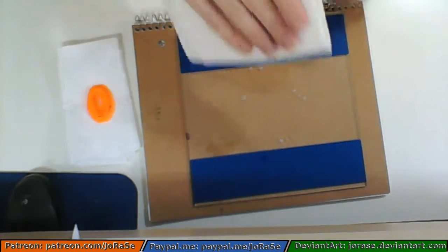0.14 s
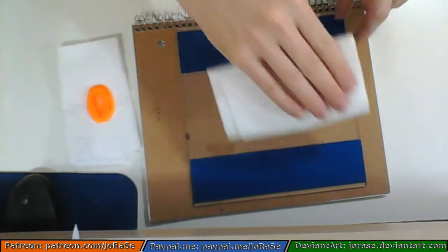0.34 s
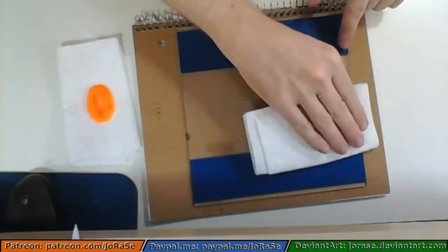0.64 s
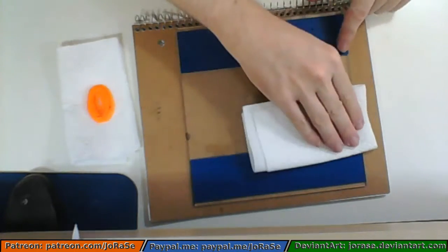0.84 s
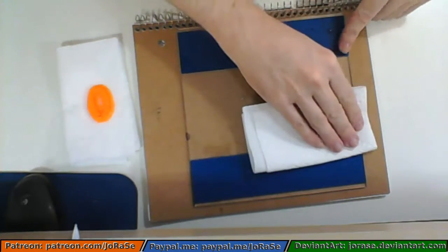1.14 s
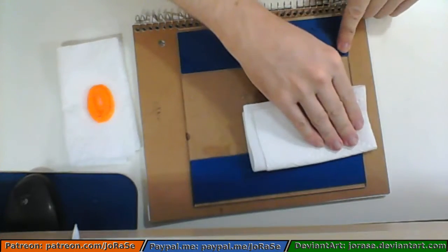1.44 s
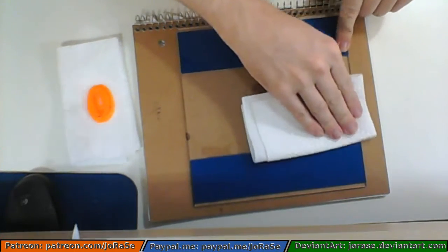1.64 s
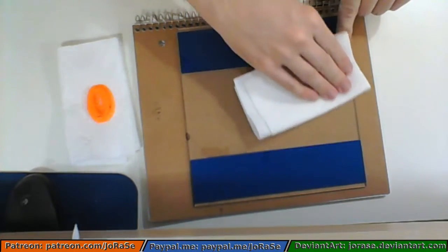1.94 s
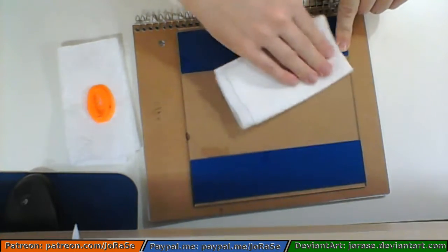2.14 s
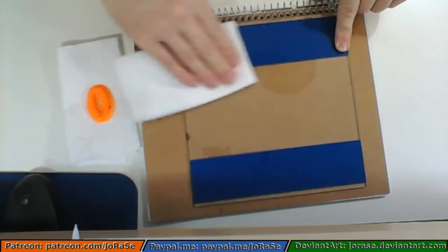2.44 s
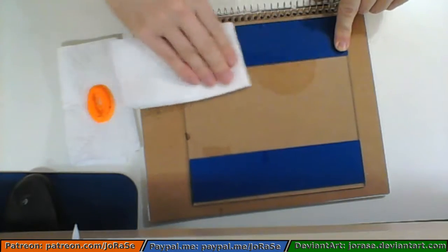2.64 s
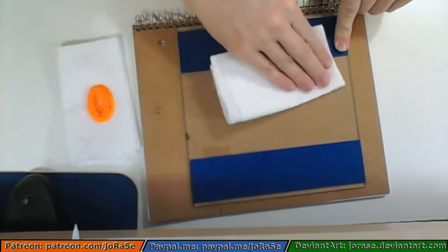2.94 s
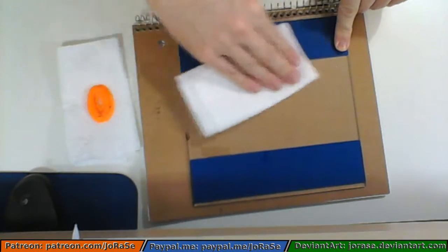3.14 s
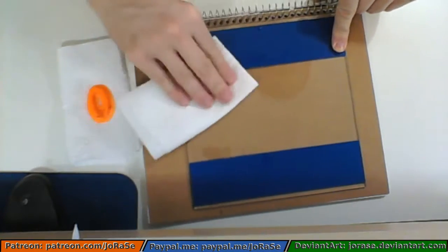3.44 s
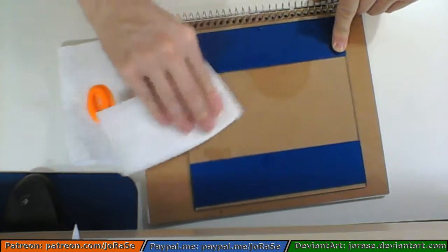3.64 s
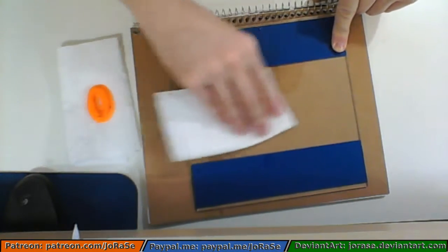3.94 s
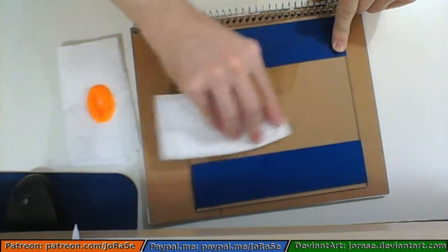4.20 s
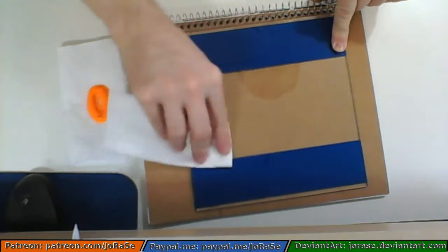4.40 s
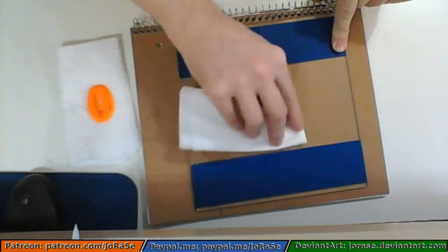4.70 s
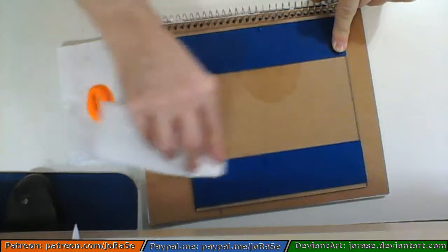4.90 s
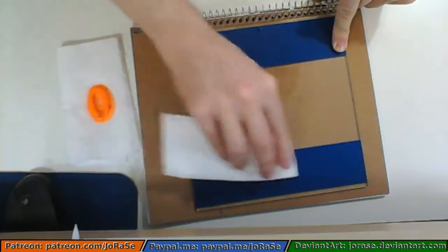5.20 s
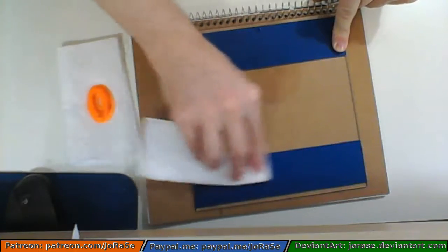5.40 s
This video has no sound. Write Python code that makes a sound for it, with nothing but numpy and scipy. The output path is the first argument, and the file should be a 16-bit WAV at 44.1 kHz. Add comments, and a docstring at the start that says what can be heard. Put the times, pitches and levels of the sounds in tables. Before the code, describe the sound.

Close microphone at a table in a quiet room with a steady low fan and mains hum. A folded paper towel brushes a glass pane, first in faint short touches, then from two seconds in firmer overlapping wipes with a grainy hiss and low-mid finger rasps. Quick separate strokes continue to the end, while arm movement pushes soft, very low puffs of air at the microphone.

```python
"""A table in a room with a fan and mains hum: their rush, low tones and a faint whine last throughout.
A folded paper towel brushes a glass pane on a notebook, at first in short, mostly faint strokes.
Catching fibres make a grainy hiss and ring the pane; dragging fingers add a rasp of low modes.
From about one second the arm pushes slow puffs of air at the microphone.
Firmer wipes crowd together after two seconds, then quick strokes and rasps go on to the end."""
import sys
import numpy as np
from scipy import signal
from scipy.fft import rfft, irfft
from scipy.io import wavfile
from scipy.ndimage import uniform_filter1d, map_coordinates

SR = 44100
rng = np.random.default_rng(int(sys.argv[2]) if len(sys.argv) > 2 else 0)


def transcribe(signal):
    """Save signal, clipped to [-1, 1], as a 16-bit WAV file at the path in sys.argv[1]."""
    frames = np.atleast_2d(signal).T
    limited = np.clip(frames, -1, 1)
    pcm = np.round(limited * 32767).astype(np.int16)
    wavfile.write(sys.argv[1], SR, pcm)


N = 245195
TIME = np.arange(N) / SR

FAN_DB, HISS_DB = -59, -80  # rms of the fan noise and of the microphone's self-noise
EDGE_HZ = 15700  # band limit of the recorder

# rise and fall times hold for a move of the typical length; longer moves start and stop more gently
EDGE_GROWTH, TYPICAL_S = 0.76, 0.14
# a positive arch is loudest in mid-move, a negative one dips there
STROKE_RISE_S, STROKE_FALL_S, STROKE_ARCH_DB = 0.024, 0.029, -1.5
CATCH_RISE_S, CATCH_FALL_S, CATCH_ARCH_DB = 0.058, 0.02, 4.5
PUFF_RISE_S, PUFF_FALL_S, PUFF_ARCH_DB = 0.0092, 0.063, 0
# the room holds each stroke and catch briefly: level and time constant of the dying power
LINGER_DB, LINGER_S = -8, 0.015

# the pressure of the hand wavers; the embossed paper grips and lets go more quickly (dB rms, Hz)
FLUTTER_DB, FLUTTER_HZ = 0.32, 16.3
CHATTER_DB, CHATTER_HZ = 0.5, 41.8
LOADING, LOADING_HZ = 0.005, 5  # rms share by which the hand bends the upper modes, and how quickly
BITE_WIDTH_HZ = 740  # band that a pressed pad lifts
LIGHT_RING, FIRM_RING = 0.42, 0.1  # share of the hiss power that comes from the glass
LIGHT_STREAK_DB, FIRM_STREAK_DB = 6, 3  # depth of the narrow bands
RASP_WIDTH_HZ = 130  # group of modes that the rasp reaches
RASP_WANDER = 0.028  # rms share by which the pitch of the rasp wanders
CATCH_CLIMB = 0.067  # share by which the pitch of the rasp climbs within a catch
SLIDE_RASP_DB = -18.5  # rasp of smooth sliding, relative to the hiss
STILL_AIR_DB, STILL_RUMBLE_DB = -54, -61.5  # air at the microphone between moves of the arm


def amp(db):
    """Decibels to gain."""
    return 10 ** (np.asarray(db) / 20)


def unit(x):
    """Scales to rms 1."""
    return x / np.sqrt(np.mean(x ** 2) + 1e-20)


def colour(x, points):
    """Filters by a gain curve of (Hz, dB) points joined on a log-frequency axis."""
    hz, db = np.transpose(points)
    bins = np.fft.rfftfreq(N, 1 / SR)
    curve_db = np.interp(np.log(bins + 1), np.log(hz + 1), db)
    return irfft(rfft(x) * amp(curve_db), N)


def drift(hz):
    """Slow chance of rms 1, fading out around the given rate."""
    bins = np.fft.rfftfreq(N, 1 / SR)
    spectrum = rfft(rng.standard_normal(N))
    return unit(irfft(spectrum * np.exp(-(bins / hz) ** 2), N))


def resonate(x, hz, width):
    """A resonance of gain 1 whose centre may move: shift to zero, smooth, shift back."""
    turn = np.exp(2j * np.pi * np.cumsum(hz * np.ones(N)) / SR)
    r = np.exp(-np.pi * width / SR)
    smooth = signal.lfilter([1 - r], [1, -r], x / turn)
    return 2 * (turn * smooth).real


def band(x, low_hz, high_hz):
    """Keeps one band of a force."""
    sos = signal.butter(4, [low_hz, high_hz], "band", fs=SR, output="sos")
    return signal.sosfilt(sos, x)


def steadied(x, size=2205):
    """Holds the level over size samples at 1, so that a curve alone sets the loudness."""
    return x / np.sqrt(np.abs(uniform_filter1d(x ** 2, size)) + 1e-20)


def swells(rows, rise_s, fall_s, arch_db):
    """One envelope per (start, length) row: a soft start, an arched middle and a soft stop."""
    start, length = np.array(rows).T[:2, :, None]
    t = TIME - start
    gentle = (length / TYPICAL_S) ** EDGE_GROWTH
    opening = (1 + np.tanh(t / (rise_s * gentle))) / 2
    closing = (1 + np.tanh((length - t) / (fall_s * gentle))) / 2
    off_centre = np.minimum(np.abs(2 * t / length - 1), 2)
    return opening * closing * amp(-arch_db * off_centre ** 2)


def level(shapes, db):
    """Envelopes, each at its own level, summed in power."""
    return np.sqrt(amp(db) ** 2 @ shapes ** 2)


def linger(gain):
    """Adds a faint dying tail to an envelope."""
    keep = np.exp(-1 / (LINGER_S * SR))
    tail_power = signal.lfilter([1 - keep], [1, -keep], (amp(LINGER_DB) * gain) ** 2)
    return np.sqrt(gain ** 2 + tail_power)


def room():
    """Fan noise, faintly wavering low tones and a high whine, and the even hiss of the microphone."""
    # Spectrum of the fan and the room. Each row: frequency in Hz, relative level in dB.
    fan_curve = [(20, 5), (75, 9), (105, 1.5), (150, -4.5), (220, 5.5), (310, -3.5), (380, 1), (520, -11),
                 (1100, -13), (1450, -16), (2000, -26), (4000, -60), (15500, -110)]
    # Steady low tones of mains and fan, and a faint high whine.
    # Each row: frequency in Hz, level in dB rms.
    steady_tones = [(74, -71.5), (120.1, -60.5), (125.2, -68), (130.9, -67.5), (250.3, -67), (261.4, -68.5),
                    (264.8, -64.5), (375.5, -79), (392.3, -84), (626, -84), (654, -83), (8000, -99.5)]
    # Spectrum of the microphone's self-noise. Each row: frequency in Hz, relative level in dB.
    hiss_curve = [(100, 0.5), (3000, 1), (5000, -1), (7000, -2.5), (10000, -6), (13000, -9.5),
                  (15600, -11.5)]
    rush = amp(FAN_DB) * unit(colour(rng.standard_normal(N), fan_curve))
    tones = 0
    for hz, db in steady_tones:
        phase = 2 * np.pi * (hz * TIME + rng.random()) + 0.17 * drift(13.0)
        tones = tones + amp(db) * np.sqrt(2) * np.sin(phase)
    self_noise = amp(HISS_DB) * unit(colour(rng.standard_normal(N), hiss_curve))
    return rush + tones + self_noise


def strokes():
    """Strokes of the towel: a loose edge hisses brighter, a pressed pad bites in one band."""
    # Each row: start in seconds, length in seconds, fibre hiss in dB, ring of the pane in dB,
    # gain of the top of the hiss in dB, gain of the bite in dB, centre of the bite in Hz.
    stroke_rows = [(0.02, 0.08, -77, -82.5, 0, -15, 4470), (0.11, 0.19, -80, -86, 3, 2, 4970),
                   (0.407, 0.051, -79, -87, 5, 0, 5000), (0.646, 0.056, -65.5, -75, -7, 9, 4930),
                   (0.765, 0.069, -80, -87, 7, 9, 4750), (0.855, 0.072, -71.5, -83, -2, 1, 6600),
                   (1.563, 0.17, -63.5, -81, 10, 12, 4600), (1.681, 0.061, -80, -71.5, 10, 11, 4300),
                   (1.78, 0.085, -70, -92, 10.5, 19, 13000), (1.913, 0.074, -78, -95, 15, 8, 4660),
                   (2.004, 0.33, -62, -93, -0.5, -4.5, 3870), (2.13, 0.28, -58, -73.5, 5, -0.5, 4840),
                   (2.307, 0.22, -54.5, -67.5, 2.5, 4, 4200), (2.672, 0.22, -56.5, -70, 2, 6, 4800),
                   (2.963, 0.037, -59.5, -79, 0.5, -8, 4300), (3.052, 0.093, -65.5, -87, -1, 2, 5100),
                   (3.16, 0.099, -60, -92, 2.5, 6, 4800), (3.233, 0.14, -61.5, -77, 4, -5, 4560),
                   (3.325, 0.071, -55, -65.5, 4, 11, 4100), (3.41, 0.049, -67, -90, 5, -5, 4500),
                   (3.457, 0.072, -62.5, -101, 9, 8, 5230), (3.543, 0.039, -68.5, -83, 7, 8, 5000),
                   (3.734, 0.052, -62, -86, 5.5, 2, 4900), (3.807, 0.04, -70.5, -100, -27, -5, 4300),
                   (3.85, 0.12, -64.5, -90, 5.5, 5.5, 6900), (4.084, 0.066, -60.5, -79, -2, 1, 4850),
                   (4.303, 0.089, -76, -86, 5, 14, 4900), (4.358, 0.068, -61, -83, -2, -3, 4300),
                   (4.511, 0.068, -66, -85, 4.5, -2, 4440), (4.569, 0.069, -62, -97, 7, 6, 4840),
                   (4.787, 0.023, -65, -78, 7, 21, 4620), (4.867, 0.051, -55.5, -96, 7.5, 14, 4400),
                   (4.916, 0.09, -53.5, -71, 3, 6, 4560), (4.998, 0.079, -66, -82, 4, 6.5, 4760),
                   (5.323, 0.037, -75, -87, 4, 8, 4750), (5.405, 0.16, -52.5, -75.5, 2.5, 5, 4530)]
    _, _, hiss_db, ring_db, top_db, bite_db, bite_hz = np.transpose(stroke_rows)
    shapes = swells(stroke_rows, STROKE_RISE_S, STROKE_FALL_S, arch_db=STROKE_ARCH_DB)
    weight = (shapes + 1e-9) / (shapes + 1e-9).sum(0)  # each stroke's share of the moment
    rub = linger(level(shapes, hiss_db))
    ring = linger(level(shapes, ring_db))
    return rub, ring, amp(top_db @ weight), amp(bite_db @ weight), bite_hz @ weight, weight


def catches():
    """Pressed fingers catch on the glass and rasp, climbing in pitch as they gather speed."""
    # Each row: start in seconds, length in seconds, rasp in dB, centre in Hz,
    # ring near 2 kHz in dB.
    catch_rows = [(0.643, 0.053, -67, 1340, -74), (2.003, 0.068, -62.5, 1380, -68),
                  (2.089, 0.092, -56.5, 1410, -70.5), (2.137, 0.12, -58, 1500, -68.5),
                  (2.257, 0.13, -66.5, 1470, -76), (2.4, 0.059, -68, 1320, -93),
                  (3.037, 0.1, -66, 1493, -93), (3.313, 0.071, -54, 1320, -65.5),
                  (3.385, 0.14, -65, 1370, -86), (3.72, 0.053, -63, 1095, -76),
                  (3.817, 0.18, -73, 1310, -85), (4.087, 0.066, -51.5, 1276, -70),
                  (4.358, 0.055, -67, 1310, -102), (4.557, 0.057, -60, 1220, -72),
                  (4.859, 0.064, -58.5, 1206, -77), (5.005, 0.038, -61.5, 940, -87),
                  (5.376, 0.094, -55.5, 1257, -83), (5.508, 0.062, -57, 1180, -82)]
    start, length, db, hz, upper_db = np.transpose(catch_rows)
    shapes = swells(catch_rows, CATCH_RISE_S, CATCH_FALL_S, arch_db=CATCH_ARCH_DB)
    progress = np.clip((TIME - start[:, None]) / length[:, None], 0, 1) - 0.5
    climbing_hz = hz[:, None] * (1 + CATCH_CLIMB * progress)
    rasp_hz = np.average(climbing_hz, axis=0, weights=shapes + 1e-9)
    return linger(level(shapes, db)), linger(level(shapes, upper_db)), rasp_hz


def slips(per_s, spread_db):
    """Tiny releases of paper fibres, of random size and sign."""
    size = amp(spread_db * np.minimum(rng.exponential(1, N), 4))
    happens = rng.random(N) < per_s / SR
    return unit(size * rng.standard_normal(N) * happens)


def pane_response():
    """Frequency response of the glass: a sum of steep-sided modes."""
    # Resonances of the pane on its notebook.
    # Each row: frequency in Hz, width in Hz (6 dB down), relative level in dB.
    pane_modes = [(965, 83, 3.5), (1171, 34, 9.5), (1275.6, 27, 9.5), (1347, 29, 8.5), (1443, 42, -2.5),
                  (1511.5, 53, 7.5), (1925, 31, 9.5), (2121, 28, 9), (2527, 62, 7.5), (2740, 30, 5),
                  (2923, 45, 3), (3098, 39, 7.5), (3363, 61, 7), (4285, 34, 11.5), (4610, 34, 3.5),
                  (4770, 31, 6.5), (4950, 43, 5), (5075, 28, 4), (5180, 15, -6), (6090, 23, 9.5),
                  (6320, 22, 9.5), (6540, 55, -0.5), (6960, 100, -1), (8750, 160, -1.5)]
    bins = np.fft.rfftfreq(N, 1 / SR)
    return sum(amp(db) / (1 + 2j * (bins - hz) / width) ** 2 for hz, width, db in pane_modes)


def loaded(x):
    """The travelling weight of the hand shifts the ring of the pane up and down."""
    offset = np.cumsum(LOADING * drift(LOADING_HZ))
    return map_coordinates(x, [np.arange(N) + offset], order=3, mode="mirror")


def streaked(x, weight, depth_db, bins_wide=3):
    """Streaks x with narrow bands, raised or lowered by chance, that change from stroke to stroke."""
    _, t, z = signal.stft(x, SR, nperseg=1024, noverlap=768)
    chance = rng.standard_normal((len(weight), len(z)))
    patterns = unit(uniform_filter1d(chance, bins_wide, axis=1))
    frames = np.minimum(t * SR, N - 1).astype(int)
    bands = patterns.T @ np.sqrt(weight[:, frames])
    gain = amp(np.interp(t, TIME, depth_db) * np.minimum(bands, 2))
    gain /= np.sqrt(np.mean(gain ** 2, axis=0))
    return signal.istft(z * gain, SR, nperseg=1024, noverlap=768)[1][:N]


def towel():
    """Slipping fibres hiss and ring the pane; narrow bands streak faint strokes more deeply."""
    # Spectrum of sliding paper. Each row: frequency in Hz, relative level in dB.
    paper_curve = [(600, -14), (1700, -13), (2300, -16), (3000, -13), (3650, -15.5), (3950, -0.5),
                   (4350, -2.5), (4900, -1.5), (5600, -3), (6000, 1.5), (7300, -0.5), (10500, -8),
                   (13000, -8), (15600, -19)]
    rub, ring, top_gain, bite_gain, bite_hz, weight = strokes()
    catch, overtone, rasp_hz = catches()
    # 0 for hiss below -64 dB, 1 above -56 dB
    firmness = np.clip((20 * np.log10(rub + 1e-9) + 64) / 8, 0, 1)
    response = pane_response()

    def glass(force):
        return steadied(irfft(rfft(force) * response, N))

    # hiss: the paper itself, mixed with the treble of the glass
    fibres = steadied(colour(slips(per_s=28000, spread_db=1.5), paper_curve))
    sheen_force = band(slips(per_s=9600, spread_db=3.5), low_hz=4140, high_hz=9400)
    sheen = loaded(glass(sheen_force))
    share = np.clip(LIGHT_RING + (FIRM_RING - LIGHT_RING) * firmness, 0, 1)
    hiss = np.sqrt(1 - share) * fibres + np.sqrt(share) * sheen
    top = colour(hiss, [(5000, -37), (7000, -8.0), (10000, 0.0)])
    bite = resonate(hiss, bite_hz, width=BITE_WIDTH_HZ)
    hiss = hiss + (top_gain - 1) * top + (bite_gain - 1) * bite
    streak_db = LIGHT_STREAK_DB + (FIRM_STREAK_DB - LIGHT_STREAK_DB) * firmness
    hiss = steadied(streaked(hiss, weight, depth_db=streak_db), size=882)

    # ring: the middle modes of the pane
    ring_force = band(slips(per_s=5900, spread_db=2.0), low_hz=2530, high_hz=3296)
    ringing = streaked(loaded(glass(ring_force)), weight, depth_db=np.full(N, 4.0))
    ringing = steadied(ringing)

    # the drag of the fingers picks out a moving group of low modes, and at times those above
    drag = slips(per_s=5800, spread_db=3.5)
    wandering_hz = rasp_hz * (1 + RASP_WANDER * drift(FLUTTER_HZ))
    rasp = glass(resonate(drag, wandering_hz, width=RASP_WIDTH_HZ))
    upper = glass(band(drag, low_hz=1882, high_hz=2090))
    rasp_gain = np.hypot(catch, amp(SLIDE_RASP_DB) * rub)

    pressure = amp(FLUTTER_DB * drift(FLUTTER_HZ) + CHATTER_DB * drift(CHATTER_HZ))
    return pressure * (rub * hiss + ring * ringing + rasp_gain * rasp + overtone * upper)


def moving_air(spectrum, size):
    """Coloured noise at the microphone, of even strength over size samples."""
    z = signal.hilbert(colour(rng.standard_normal(N), spectrum))
    return unit(z.real / np.sqrt(uniform_filter1d(np.abs(z) ** 2, size)))


def draught():
    """Slow pressure swings and a low rumble at the microphone as the arm moves."""
    # Air pushed by the arm. Each row: start in seconds, length in seconds, slow swing in dB,
    # rumble in dB.
    puff_rows = [(0.977, 0.16, -34.5, -47), (1.206, 0.084, -31.5, -51.5), (1.403, 0.12, -35.5, -45.5),
                 (1.661, 0.094, -34, -47.5), (1.855, 0.061, -43.5, -52), (2.182, 0.091, -40, -72),
                 (2.359, 0.23, -35, -53), (2.6, 0.94, -53.5, -54.5), (3.119, 0.23, -31, -46),
                 (3.331, 0.22, -32, -44), (3.564, 0.15, -34.5, -66), (3.673, 0.23, -30.5, -52.5),
                 (3.916, 0.058, -26, -45.5), (4.056, 0.27, -32, -45.5), (4.262, 0.19, -38.5, -59),
                 (4.544, 0.15, -31.5, -51), (4.754, 0.31, -34, -53), (5.09, 0.23, -45, -63),
                 (5.366, 0.13, -32, -42)]
    # Spectrum of the slow swings. Each row: frequency in Hz, relative level in dB.
    swing_curve = [(2, -20), (6, 0), (9, -6), (16, -14), (24, -32), (48, -60), (200, -100)]
    # Spectrum of the rumble of eddies. Each row: frequency in Hz, relative level in dB.
    eddy_curve = [(8, -32), (18, 5), (26, 7), (33, -6), (48, -20.5), (90, -35), (200, -80), (600, -107)]
    _, _, swing_db, rumble_db = np.transpose(puff_rows)
    shapes = swells(puff_rows, PUFF_RISE_S, PUFF_FALL_S, arch_db=PUFF_ARCH_DB)
    swing_gain = np.hypot(level(shapes, swing_db), amp(STILL_AIR_DB))
    rumble_gain = np.hypot(level(shapes, rumble_db), amp(STILL_RUMBLE_DB))
    swings = swing_gain * moving_air(swing_curve, size=6615)
    return swings + rumble_gain * moving_air(eddy_curve, size=4410)


def scene():
    """Room, towel on glass and moving air at one microphone."""
    return (room() + towel() + draught())[None]


def record(dry):
    """The band limit of the recorder: a steep low-pass."""
    low_pass = signal.firwin(511, EDGE_HZ, window=("kaiser", 9), fs=SR)
    return signal.oaconvolve(dry, low_pass[None], "same")


dry = scene()
out = record(dry)
transcribe(out)
```